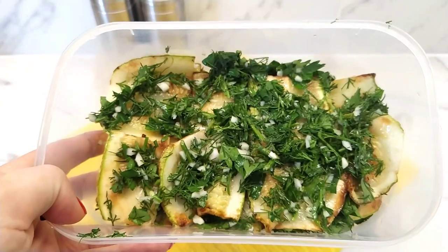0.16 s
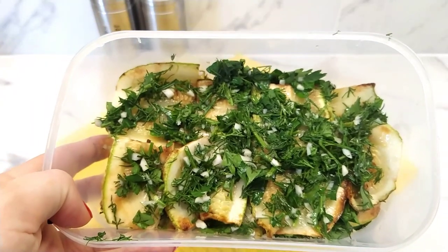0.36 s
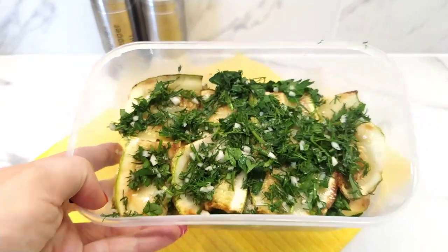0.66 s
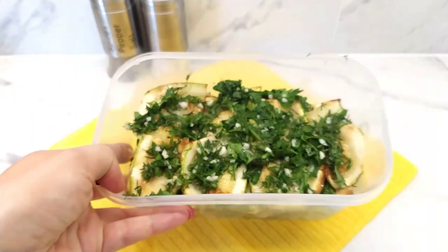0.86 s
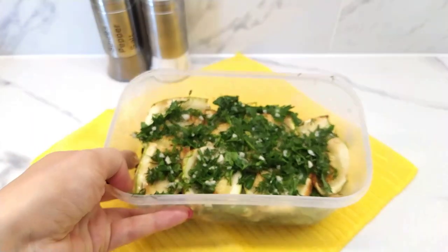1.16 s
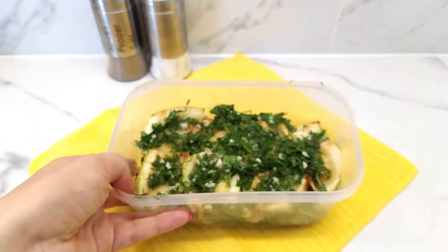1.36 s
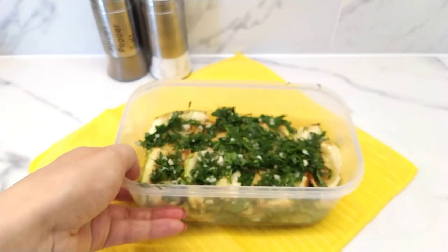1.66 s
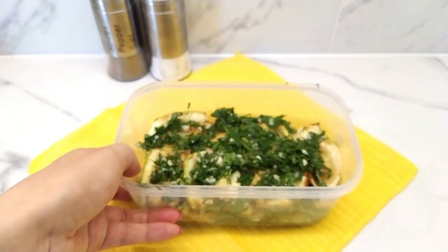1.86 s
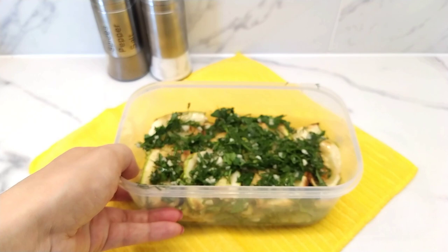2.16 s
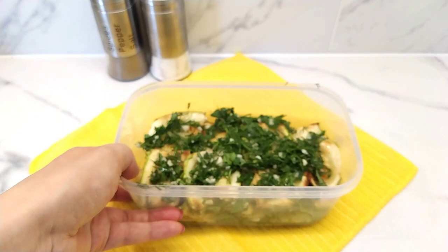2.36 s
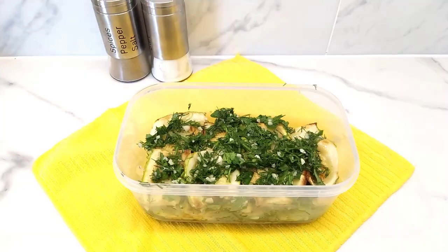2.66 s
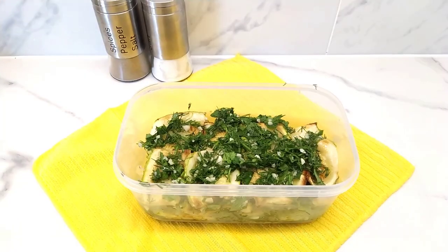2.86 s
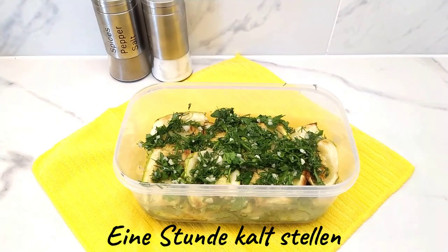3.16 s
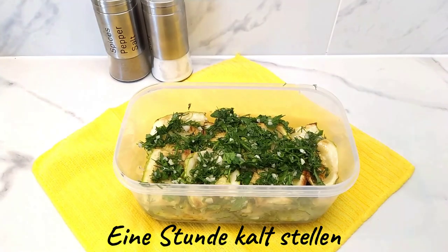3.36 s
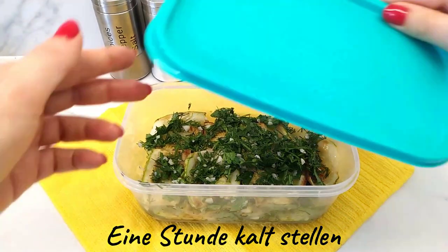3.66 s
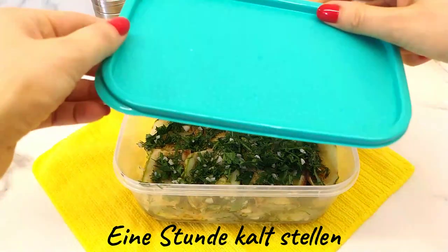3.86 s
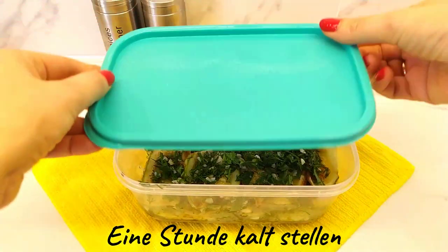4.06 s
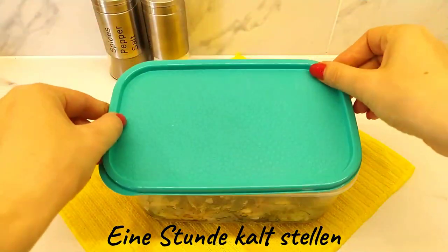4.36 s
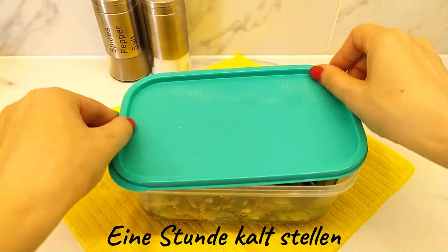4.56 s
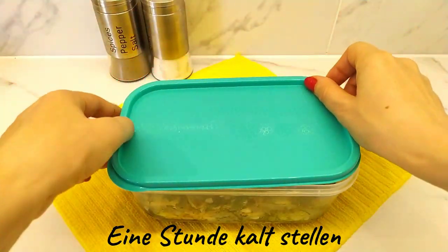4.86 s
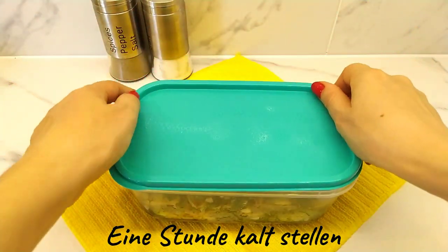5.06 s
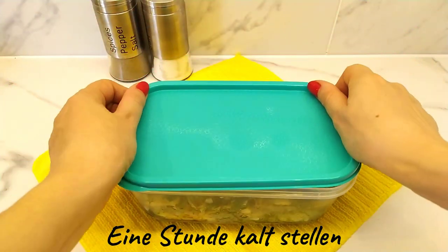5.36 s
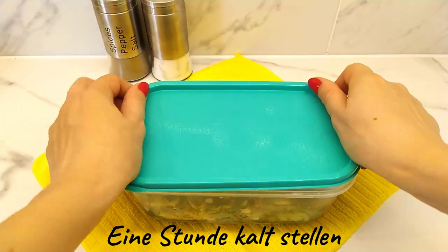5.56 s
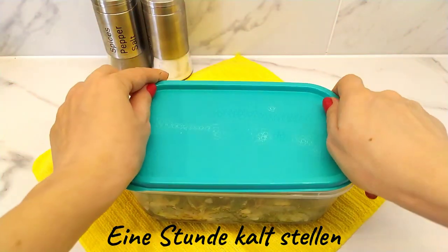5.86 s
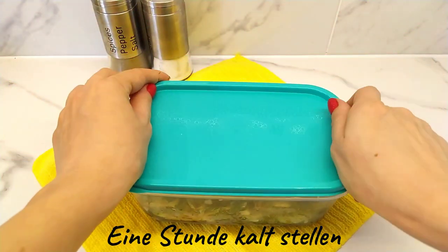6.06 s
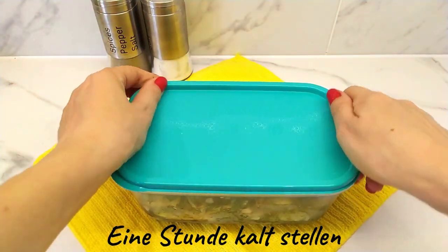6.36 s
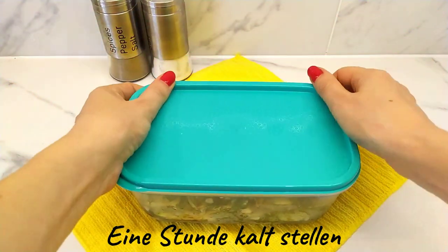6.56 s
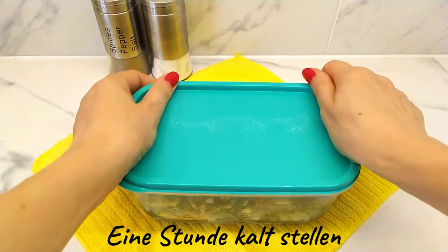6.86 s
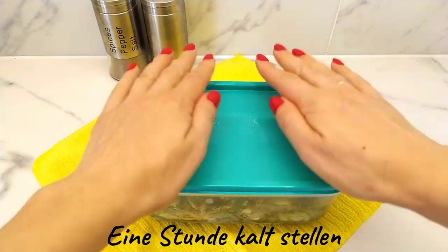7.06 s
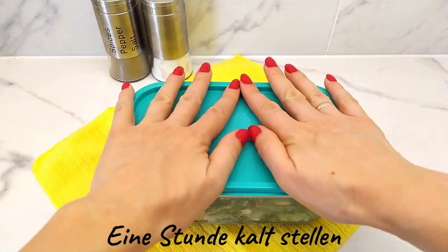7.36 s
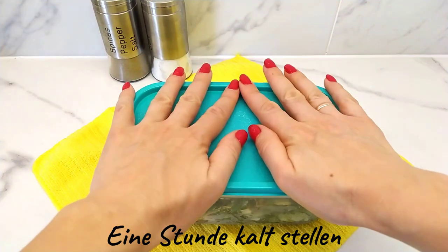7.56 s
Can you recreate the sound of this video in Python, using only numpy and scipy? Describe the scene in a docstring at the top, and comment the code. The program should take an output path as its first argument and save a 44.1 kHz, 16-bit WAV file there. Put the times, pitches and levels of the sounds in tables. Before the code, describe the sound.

A soft lid is fumbled onto a plastic food box with hollow knocks and scrapes, then snaps shut over low kitchen hum.

```python
"""A soft lid is slid into place and snapped on a plastic food box: each contact flexes the lid, rings the
stiff walls and cracks at the rim, as damped modes and bursts of noise. Close by, rim and base stick and
slip, skin hisses over the plastic, and dull thuds pass through the cloth into the kitchen worktop; one
faint dry click stands apart. Around it: the small tiled room's echoes, mains hum, a hollow drone, rumble,
even air noise, and a soft distant rush with whistles, in stereo through a phone's microphone."""
import sys
import numpy as np
from scipy import signal
from scipy.fft import rfft, irfft, next_fast_len
from scipy.io import wavfile
from scipy.ndimage import uniform_filter1d

SR = 44100
rng = np.random.default_rng(int(sys.argv[2]) if len(sys.argv) > 2 else 0)


def master_out(mix):
    """Clip the mix to full scale and print it as 16-bit PCM to the path in sys.argv[1]."""
    frames = np.transpose(np.atleast_2d(mix))
    ceiling = np.clip(frames, -1, 1)
    pcm = np.round(ceiling * 32767).astype(np.int16)
    wavfile.write(sys.argv[1], SR, pcm)


N = 340011
TIME = np.arange(N) / SR
RING_TIME = TIME[:SR // 3]  # time axis of every hit and of the room's response

# Levels are layer levels ahead of the trims in the functions, the room and the microphone.
# mains hum, wavering: (t/s, level/dB)
HUM_LEVEL = [(0, -47.5), (2.7, -47), (3.45, -47.5), (5.9, -47.5), (6.15, -50.5), (6.35, -47), (6.75, -48),
             (7, -44), (7.2, -47.5), (7.7, -46)]
# soft distant rush that swells and dies away: (t/s, level/dB)
RUSH_LEVEL = [(0, -67.5), (1.2, -63), (1.8, -62.5), (2.3, -67.5), (3.4, -69), (7.7, -70)]
# faint wavering tones in the rush: (start t/s, end t/s, from f/Hz, to f/Hz, width/Hz, level/dB re rush)
WHISTLES = [(0, .8, 296, 300, 35, -3), (.25, .75, 440, 435, 50, -7), (.92, 1.78, 311, 332, 36, -1.5),
            (1, 2.1, 165, 165, 22, -9), (0, 1.9, 1590, 1950, 55, -15), (.95, 1.8, 1960, 2050, 55, -17),
            (.3, 1.3, 3430, 3510, 100, -21.5), (2.03, 2.2, 1560, 1560, 60, -15)]
# early echoes from worktop, tiles and cupboards: (delay t/s, level/dB)
ECHOES = [(.0023, -26), (.0062, -37), (0.011, -16), (0.025, -26)]
# soft bumps of the box on the worktop: (t/s, level/dB, f/Hz)
BUMPS = [(2.225, -49.5, 100), (2.267, -50.5, 144), (2.644, -51.5, 119), (2.669, -47.5, 119),
         (2.705, -53, 125), (2.761, -51, 125), (2.866, -45.5, 78), (2.872, -56, 190), (4.246, -47, 118),
         (4.611, -47, 117), (6.948, -53, 125)]
# base scuffing over the cloth: (start t/s, length/s, rasp level/dB, groan level/dB, groan f/Hz)
SCUFFS = [(1.867, 0.037, -63, -65.5, 422), (2.19, 0.046, -67.5, -62.5, 540),
          (2.215, 0.022, -64.5, -58, 760), (2.308, 0.052, -70, -77, 728), (2.665, 0.066, -91, -69.5, 360),
          (2.86, .04, -88, -61.5, 424), (3.154, 0.02, -68, -69, 1210), (7.286, 0.079, -71, -69.5, 369)]
# resonances of the scuffing base: (f/Hz, width/Hz, level/dB)
BASE_MODES = [(1300, 600, -3), (2200, 550, 0), (3700, 700, -2)]
# skin brushing the box: (start t/s, length/s, hiss level/dB, focus f/Hz)
BRUSHES = [(0.13, 0.14, -68, 13000), (0.3, 0.11, -71.5, 10500), (0.404, 0.035, -67.5, 8500),
           (0.468, 0.073, -66.5, 10200), (0.616, 0.059, -70, 9000), (0.741, 0.026, -64, 8300),
           (0.81, 0.022, -70.5, 8800), (0.955, 0.031, -60, 8800), (1.013, 0.026, -59.5, 8300),
           (1.126, 0.022, -68.5, 7500), (1.344, .02, -69, 9100), (1.48, 0.021, -71.5, 9500),
           (1.98, .04, -71.5, 11000), (2.14, 0.061, -76, 10000), (2.207, 0.057, -64, 7900),
           (2.288, 0.054, -57.5, 11700), (2.362, .035, -65, 11500), (3.163, 0.035, -64, 8900),
           (3.446, 0.032, -65.5, 10000), (3.525, 0.034, -65, 8900), (4.85, 0.023, -63, 10000),
           (5.003, 0.027, -72.5, 9400), (5.134, 0.045, -71.5, 9500), (7.341, 0.034, -68, 10000),
           (7.511, 0.073, -70.5, 7700)]
# rim dragging under the lid: (start t/s, length/s, judder level/dB, scratch level/dB, squeak level/dB,
# nominal slips per s)
DRAGS = [(3.883, .022, -48.5, -57, -80, 245), (3.928, 0.02, -48, -59, -80, 218),
         (4.137, 0.05, -60, -70, -74, 102), (4.201, 0.037, -49.5, -57.5, -67, 224),
         (4.245, 0.035, -54, -71, -80, 130), (4.492, 0.093, -55, -71, -80, 91),
         (4.587, 0.046, -48.5, -67, -73, 85), (4.664, 0.013, -48.5, -70, -74, 80),
         (4.74, .03, -57, -80, -90, 110), (4.805, 0.039, -47, -60, -62.5, 84),
         (5.244, .008, -47, -65, -85, 290)]
# contacts of fingers, lid and rim, and one faint dry click (3.105 s) built from the same layers:
# (t/s, wall ring level/dB, rim crack level/dB, fine tick level/dB, lid flex level/dB,
# left minus right/dB, ring of the touched spot f/Hz)
CONTACTS_AND_CLICK = [(1.855, -64, -59.5, -79, -66, 0, 744), (2.867, -67, -77, -83, -58, 2, 800),
                      (3.1052, -67, -68.5, -73, -62, -1, 700), (3.2924, -67, -54, -66, -67, -0.5, 1010),
                      (3.454, -68, -61, -69, -67, -4, 910), (3.5917, -42, -61, -70, -46.5, 0, 900),
                      (3.5965, -45, -62, -78, -64, 2, 990), (3.6095, -75, -54.5, -61, -54, 0, 620),
                      (3.792, -56, -61.5, -68, -54.5, -1, 780), (3.853, -74, -63, -71, -66, 0, 900),
                      (3.883, -47, -57, -58, -73, -6.5, 900), (3.8875, -44.5, -51, -58, -54, -1, 615),
                      (3.9395, -45, -59.5, -70, -51, 2, 780), (4.047, -50.5, -54, -59, -49.5, 0, 613),
                      (4.209, -50.5, -68, -70, -64, -4, 480), (4.2148, -50, -60, -62, -64, 4, 604),
                      (4.363, -59, -69.5, -76, -56.5, 0, 620), (4.4589, -58, -66, -70, -68, 1, 1050),
                      (4.486, -57.5, -64.5, -75, -52, 0, 1040), (4.601, -67, -65, -66, -71, 1, 980),
                      (4.755, -68, -55.5, -65, -62, -2, 1000), (4.761, -73, -57, -64, -66, 0, 1000),
                      (4.801, -47.5, -70, -70, -55, -1, 600), (4.8119, -55, -68, -64, -59, 2, 970),
                      (4.825, -72, -59, -63, -43.5, 0, 974), (4.837, -55, -60, -68, -48, 4, 615),
                      (4.845, -53, -55, -65, -52, 0, 950), (5.258, -81, -52.5, -60, -53, 0, 1110),
                      (5.2616, -47.5, -52, -54, -29, -1.5, 500), (5.355, -42, -51.5, -58, -35.5, 0, 790),
                      (5.384, -42, -55, -48, -31, 0, 710), (5.3906, -57, -58, -49, -31, -1, 1110),
                      (5.3979, -50, -57, -51, -44, -10, 840), (5.4078, -54, -56, -55, -38.5, 0, 800),
                      (5.417, -58, -62, -56, -47, 0, 800), (5.809, -62, -90, -90, -58, -1, 780),
                      (6.108, -55, -61, -64, -73, -6, 1010)]
# the rim springs from a finger or snaps over its bead: (the seven columns of the contacts,
# contact time constant/s, rim ring level/dB)
SNAPS = [(2.4, -68, -44.5, -49.5, -53, 3, 1290, 0.0003, -58),
         (5.3858, -36.5, -31, -39, -28, 0.5, 890, 0.00055, -40),
         (6.114, -57, -50, -51.5, -48, 0.5, 1000, 0.00043, -58.5),
         (7.0176, -50, -49.5, -51, -58, -1.5, 1260, 0.00055, -42)]
# the lid pops in, seats and bounces, now taut and higher: (t/s, level/dB, f/Hz, t60/s)
SEATING = [(5.386, -38.5, 231, 0.038), (5.3863, -33.5, 446, 0.0075), (5.3868, -37, 982, 0.014),
           (5.391, -29.5, 306, 0.079), (5.404, -33, 388.4, .1), (5.436, -42, 389.4, 0.24)]

# modes of the lid flexing over the enclosed air: (f/Hz, level/dB, t60/s)
LID_MODES = [(180, -12, 0.072), (214, -1, 0.039), (310, -1, 0.1)]
# modes of the box's stiff walls: (f/Hz, level/dB, t60/s)
WALL_MODES = [(378, 4.5, 0.12), (460, -6.5, 0.26), (589.4, 9.5, 0.095), (673, -3, 0.055), (783, -1, 0.031),
              (967, 7, 0.042), (1060, 3.5, 0.03), (1360, -6, 0.036), (2066, -5, 0.064)]
# the shut box ringing on faintly: (f/Hz, level/dB, t60/s)
SHUT_MODES = [(590, 2, 0.18), (732, 0, 0.18), (820, 3, 0.12), (1150, -3, .2), (1360, -4, .22)]

# colour of the low rumble: (f/Hz, level/dB per Hz)
RUMBLE_COLOUR = [(20, -47), (30, -8), (39, 5), (60, 6.5), (85, 6), (125, 0.5), (170, -3.5), (230, -49.5)]
# colour of the even air noise: (f/Hz, level/dB per Hz)
AIR_COLOUR = [(170, -13.5), (240, -15.5), (330, -12), (480, -18.5), (700, -20), (930, -19.5), (1700, -31.5),
              (3900, -33), (8000, -37), (12000, -40.5), (15500, -55)]
# colour of the distant rush: (f/Hz, level/dB per Hz)
RUSH_COLOUR = [(200, -9), (300, -4), (460, 7.5), (600, -5.5), (900, -0.5), (1400, -5), (2100, -7.5),
               (3500, -14), (6000, -24), (15000, -55)]
# colour of the base rasping over cloth: (f/Hz, level/dB per Hz)
RASP_COLOUR = [(400, 0), (700, -3), (1400, -2), (2200, 4.5), (2900, -2), (3800, -2), (6500, -2),
               (10000, -13), (15000, -24)]
# colour of skin on plastic: (f/Hz, level/dB per Hz)
SKIN_COLOUR = [(600, -45), (1500, 14), (4000, -1.5), (6000, -2), (8500, 1.5), (11000, -2), (15000, -7.5)]
# colour of the dragging rim's scratch: (f/Hz, level/dB per Hz)
SCRATCH_COLOUR = [(500, -24), (1500, 8), (3500, 8.5), (6000, 3), (8600, -3), (11000, -2), (15000, -18)]
# colour of its tiny squeak: (f/Hz, level/dB per Hz)
SQUEAK_COLOUR = [(6500, -36), (8000, -11), (8600, 4), (9300, -22), (12000, -38)]
# colour of the crack at the rim: (f/Hz, level/dB per Hz)
CRACK_COLOUR = [(600, -23), (1200, 2), (1750, -2), (2450, 0.5), (3300, -1), (4300, -0.5), (6000, -2),
                (9000, -11), (16000, -45)]
# colour of the fine tick: (f/Hz, level/dB per Hz)
TICK_COLOUR = [(2500, -24), (5000, -28), (7000, -6), (9500, -4.5), (12000, -11), (15500, -20)]
# quick shiver of the taut rim: (f/Hz, level/dB per Hz)
RIM_COLOUR = [(300, -17), (660, 5.5), (900, 4), (1260, 9.5), (1600, -2.5), (1900, 3), (2400, 2.5),
              (2750, 3), (3150, -15), (3650, -10), (4250, -3), (5000, -3), (9000, -33)]

RUMBLE_START_DB, RUMBLE_FALL_DB_PER_S = -55.5, 0.62
WHISTLE_FADE_S, WHISTLE_WAVER = 0.079, 0.005  # waver is a share of the frequency
SCUFF_ATTACK_S, SCUFF_RELEASE_S = 0.016, 0.051
BRUSH_ATTACK_S, BRUSH_RELEASE_S = 0.01, 0.0083
DRAG_ATTACK_S, DRAG_RELEASE_S = 0.0078, 0.017
SLIP_JITTER, SLIP_UNEVEN_DB = 0.16, 2  # scatter of the log gap between slips, and of their size
SCRATCH_GRAIN_S = 0.0025
PRESSURE_DB, PRESSURE_HZ = 3, 31.2  # how much and how fast the hand's pressure varies while dragging
LIGHT_HIT_S, EDGE_DB = 0.00048, -7  # time constant of a light hit; hard edge of cracks and ticks
SHUT_S, SHUT_DB = 5.387, -47.5
MIC_TOP_HZ = 15600


def undb(db):
    """Decibels to gain."""
    return 10 ** (np.asarray(db) / 20)


def unit(x):
    """Scale to rms 1."""
    return x / np.sqrt(np.mean(x ** 2))


def blow(x, span=0.02):
    """Scale a stereo hit so that its energy equals rms 1 over the span in seconds."""
    return x / np.sqrt(np.sum(x ** 2) / (2 * span * SR))


def add(out, start, x):
    """Mix a stereo sound in at its start time in seconds."""
    i = int(start * SR)
    out[:, i:i + x.shape[1]] += x[:, :N - i]


def convolve(x, response):
    """Pass a sound through a response, keeping its length."""
    return signal.fftconvolve(np.atleast_2d(x), np.atleast_2d(response), axes=1)[:, :x.shape[-1]]


def filtered(x, order, hz, kind="low"):
    """Butterworth low-pass or high-pass."""
    return signal.sosfilt(signal.butter(order, hz, kind, fs=SR, output="sos"), x)


def colour(x, points, size=4096):
    """Minimum-phase filter with the given (f/Hz, level/dB) outline."""
    hz, db = np.transpose(points)
    bins = np.maximum(np.fft.rfftfreq(size, 1 / SR), 1)
    outline_db = np.interp(np.log(bins), np.log(hz), db)
    # 12 dB per octave down below the first point
    outline_db = outline_db - 12 * np.maximum(np.log2(hz[0] / bins), 0)
    # folding the cepstrum makes the filter causal
    cepstrum = irfft(np.log(undb(outline_db)))
    cepstrum[1:size // 2] *= 2
    cepstrum[size // 2 + 1:] = 0
    return convolve(x, irfft(np.exp(rfft(cepstrum))))


def pair(n, likeness):
    """Left and right noise with a shared part."""
    noise, share = rng.standard_normal((3, n)), np.clip(likeness, 0, 1)
    return np.sqrt(share) * noise[0] + np.sqrt(1 - share) * noise[1:]


def pan(db):
    """Left and right gains for a left-minus-right level."""
    return undb(np.array([[db], [-db]]) / 2)


def walk(rate):
    """Smooth random wander of rms 1, stepping at the given rate per second."""
    k = max(int(SR / rate), 1)
    steps = np.repeat(rng.standard_normal(N // k + 1), k)
    return unit(uniform_filter1d(uniform_filter1d(steps, k), k)[:N])


def narrow(hz, width):
    """Noise in one narrow resonance whose centre may move."""
    phase = 2 * np.pi * np.cumsum(hz * np.ones(N)) / SR
    return unit(walk(width) * np.cos(phase) + walk(width) * np.sin(phase))


def stroke(start, length, attack_s, release_s):
    """Gain of one movement: it swells up to its start, holds and dies away."""
    outside = np.maximum((start - TIME) / attack_s, (TIME - start - length) / release_s)
    return np.exp(-np.clip(outside, 0, 20))


def slips(rate, uneven_db):
    """Random stick-slip releases of unequal size."""
    return (rng.random(N) < rate / SR) * undb(uneven_db * np.clip(rng.standard_normal(N), -2, 2))


def grit(releases, grain_s, outline):
    """Every release throws a tiny, decaying puff of coloured noise."""
    shape = convolve(releases, np.exp(-RING_TIME / grain_s))
    return unit(colour(pair(N, 0.033) * shape, outline))


def ring(modes, scatter_db, detune, spread):
    """Damped modes; place and grip shift strength and pitch; each sits spread radians off centre."""
    out = 0
    for (hz, db, t60), (a, b, c) in zip(modes, rng.standard_normal((len(modes), 3))):
        offset = spread * np.sign(c) * np.array([[1], [-1]])
        phase = 2 * np.pi * hz * (1 + detune * b) * RING_TIME + offset
        out = out + undb(db + scatter_db * a - 60 * RING_TIME / t60) * np.sin(phase)
    return out * (1 - np.exp(-RING_TIME / 0.0025))


def mains_hum():
    """A 100 Hz tone, slightly unsteady in phase and level."""
    tone = unit(np.sin(2 * np.pi * 100 * TIME + 0.061 * walk(15.0)))
    return tone * undb(np.interp(TIME, *np.transpose(HUM_LEVEL)) + 0.5 * walk(11))


def hollow_drone():
    """A narrow resonance of noise around 300 Hz."""
    return narrow(300, width=49) * undb(-70)


def low_rumble():
    """Bass noise, largely alike left and right, that slowly eases."""
    return unit(colour(pair(N, 0.65), RUMBLE_COLOUR)) * undb(RUMBLE_START_DB - RUMBLE_FALL_DB_PER_S * TIME)


def room_air():
    """Wide, even air noise with a slight wander in level."""
    return unit(colour(pair(N, 0.12), AIR_COLOUR)) * undb(-67 + 0.86 * walk(13))


def distant_rush():
    """Coloured noise far off, with narrow wavering tones gliding in and out under the same swell."""
    rush = unit(colour(pair(N, 0.07), RUSH_COLOUR))
    for start, end, from_hz, to_hz, width, db in WHISTLES:
        hz = np.interp(TIME, [start, end], [from_hz, to_hz]) * (1 + WHISTLE_WAVER * walk(5))
        fade = stroke(start, end - start, WHISTLE_FADE_S, WHISTLE_FADE_S)
        rush = rush + undb(db) * narrow(hz, width) * fade
    return rush * undb(np.interp(TIME, *np.transpose(RUSH_LEVEL)))


def background():
    """The low layers and the airy ones, each group a little to the left."""
    low = mains_hum() + hollow_drone() + low_rumble()
    airy = room_air() + distant_rush()
    return low * pan(1.4) + airy * pan(0.65)


def kitchen(x, wet_db=-7, t60_low=0.44, t60_high=0.47, split_hz=1200):
    """A few close echoes, then the short bright tail of a tiled room."""
    noise = pair(len(RING_TIME), 0.037)
    low = filtered(pair(len(RING_TIME), 1.0), 2, split_hz)
    high = colour(noise, [(500, 0.79), (1400, 2.5), (6500, 5.6), (10000, 1.5), (15000, 6.9)])
    tail = low * undb(-60 * RING_TIME / t60_low) + high * undb(-60 * RING_TIME / t60_high)
    tail *= 1 - np.exp(-RING_TIME / 0.0014)
    # reflections arrive in clumps
    tail *= undb(3.5 * walk(220)[:len(RING_TIME)])
    response = undb(wet_db) * tail / np.sqrt(np.sum(tail ** 2) / 2)
    # each echo reaches left and right at slightly different times
    for (delay, db), skew in zip(ECHOES, rng.uniform(-0.00014, 0.0001, len(ECHOES))):
        response[[0, 1], [int((delay + skew) * SR), int((delay - skew) * SR)]] += undb(db)
    response[:, 0] += 1  # direct sound
    return convolve(x, response)


def bumps(t60=0.074):
    """The filled box thuds dully through the cloth into the worktop: short damped sines."""
    out = np.zeros((2, N))
    for start, db, hz in BUMPS:
        thud = np.sin(2 * np.pi * hz * RING_TIME) * undb(-60 * RING_TIME / t60)
        thud *= 1 - np.exp(-RING_TIME / 0.004)
        add(out, start, undb(db) * blow(np.array([thud, thud])))
    return out


def scuffing(hollow_hz=260, hollow_db=-4, base_db=-7, groan_width=0.5):
    """The base rasps over the cloth; walls and hollow of the box groan as it sticks and slips."""
    base = 0
    for hz, width, db in BASE_MODES:
        # the resonances come and go
        base = base + undb(db + 5 * walk(25)) * narrow(hz * (1 + 0.03 * walk(14)), width)
    rasp = grit(slips(rate=600, uneven_db=0.5), 0.0023, RASP_COLOUR) * undb(1.0)
    rasp = rasp + undb(base_db) * unit(base)
    hollow = undb(hollow_db) * narrow(hollow_hz, width=330)
    out = 0
    for start, length, rasp_db, groan_db, hz in SCUFFS:
        groan = narrow(hz, width=groan_width * hz) + hollow
        gain = stroke(start, length, SCUFF_ATTACK_S, SCUFF_RELEASE_S)
        out = out + gain * (undb(rasp_db) * rasp + undb(groan_db) * groan)
    return out


def brushing(brush_db=-2, focus_db=7):
    """Skin hisses over the plastic; each stroke favours its own focus by focus_db per octave."""
    hiss = grit(slips(rate=5000, uneven_db=5.5), 0.0037, SKIN_COLOUR)
    size = next_fast_len(N, True)
    spectrum, bins = rfft(hiss, size), np.fft.rfftfreq(size, 1 / SR) + 1
    out = 0
    for start, length, db, hz in BRUSHES:
        tuned = unit(irfft(spectrum * undb(-focus_db * np.abs(np.log2(bins / hz))))[:, :N])
        out = out + undb(db) * stroke(start, length, BRUSH_ATTACK_S, BRUSH_RELEASE_S) * tuned
    return undb(brush_db) * out * pan(8.2)


def catches(rate, count=3000):
    """The rim catches and lets go at a nearly even pace: impulses of uneven size."""
    gap, size = rng.standard_normal((count, 2)).T
    at = (np.cumsum(np.exp(SLIP_JITTER * gap)) * SR / rate).astype(int)
    return unit(np.bincount(at[at < N], undb(SLIP_UNEVEN_DB * size)[at < N], N))


def puffs(pushes, outline):
    """Each push throws a short puff of coloured noise of the same energy."""
    decay = np.exp(-2 * RING_TIME / SCRATCH_GRAIN_S)
    power = np.abs(convolve(pushes ** 2, decay / decay.sum()))
    return unit(colour(pair(N, 0.043), outline)) * np.sqrt(power)


def rubbing(judder_db=-2, scratch_db=-3, squeak_db=-3, soft_hz=1700):
    """The dragging rim sticks and slips; each slip judders the box, scratches and squeaks."""
    pushes = 0
    for start, length, *levels_db, rate in DRAGS:
        drag_slips = stroke(start, length, DRAG_ATTACK_S, DRAG_RELEASE_S) * catches(rate)
        pushes = pushes + undb(levels_db)[:, None] * drag_slips
    judder, scratch, squeak = pushes
    drag = undb(scratch_db) * puffs(scratch, SCRATCH_COLOUR)
    drag = drag + undb(squeak_db) * puffs(squeak, SQUEAK_COLOUR)
    # the load wanders between two corners, each ringing a little differently
    corner = 1.2 * walk(25)
    for share in np.cos(corner), np.sin(corner):
        lid = blow(ring(LID_MODES, scatter_db=2, detune=0.035, spread=0.15))
        walls = blow(ring(WALL_MODES, scatter_db=2, detune=0.035, spread=0.5))
        # the soft rim lets go gently, so the high wall modes stay quiet
        body = filtered(lid + walls, 2, soft_hz)
        drag = drag + undb(judder_db) * convolve(share * judder, blow(body, span=1 / SR))
    return drag * undb(PRESSURE_DB * walk(PRESSURE_HZ))


def burst(length, outline, likeness, after_db, after_s, edge_db):
    """A sharp release with a hard leading edge, followed by a brief shiver."""
    release = np.exp(-RING_TIME / length) + undb(after_db) * np.exp(-RING_TIME / after_s)
    shape = (1 - np.exp(-RING_TIME / length)) ** 2 * release
    spectrum = rfft(pair(len(RING_TIME), likeness) * shape)
    # a sudden release pushes all broad bands equally; the outline gives the colour
    spectrum = spectrum / np.sqrt(uniform_filter1d(np.abs(spectrum) ** 2, size=300))
    push = irfft(spectrum, len(RING_TIME)) * (RING_TIME < RING_TIME[-1] / 2)
    push[:, int(length * SR)] += undb(edge_db)
    return blow(colour(push, outline))


def layered_hit(wall, crack, tick, flex, side, spot_hz, length, crack_db=-3, flex_db=-4, wall_db=-3,
                tick_db=-3, knock_db=-6, knock_s=0.00171, focus_db=13.5):
    """Layers of a contact: lid flex, wall ring, knock at the touched spot, rim crack and fine tick."""
    # wall modes answer less with every octave away from the spot's own ring
    wall_modes = [(hz, db - focus_db * abs(np.log2(hz / spot_hz)), t60) for hz, db, t60 in WALL_MODES]
    spot = [(spot_hz / 2, -13), (spot_hz, 0), (1.3 * spot_hz, -4), (2 * spot_hz, -19), (10 * spot_hz, -60)]
    lid_flex = blow(ring(LID_MODES, scatter_db=0.8, detune=0.008, spread=0.15))
    wall_ring = blow(ring(wall_modes, scatter_db=3, detune=0.025, spread=0.42))
    knock = burst(knock_s, spot, likeness=0.8, after_db=-49, after_s=0.0028, edge_db=-16.5)
    rim_crack = burst(length, CRACK_COLOUR, likeness=0.054, after_db=-21.5, after_s=0.0083, edge_db=EDGE_DB)
    fine_tick = burst(length, TICK_COLOUR, likeness=0.023, after_db=19, after_s=0.01, edge_db=EDGE_DB)
    hit = undb(flex + flex_db) * lid_flex
    hit += undb(wall + wall_db) * wall_ring
    hit += undb(wall + knock_db) * knock
    hit += undb(crack + crack_db) * rim_crack
    hit += undb(tick + tick_db) * fine_tick * pan(6)
    return hit * pan(side)


def contacts_and_click():
    """Light contacts and the dry click, snaps that ring the rim, and the lid seating as damped modes."""
    out = np.zeros((2, N))
    for start, *layers in CONTACTS_AND_CLICK:
        add(out, start, layered_hit(*layers, LIGHT_HIT_S))
    for start, *layers, rim_db in SNAPS:
        rim = burst(0.00296, RIM_COLOUR, likeness=0.44, after_db=-28.5, after_s=0.021, edge_db=-2)
        add(out, start, layered_hit(*layers) + undb(rim_db) * rim)
    for start, db, hz, t60 in SEATING:
        mode = ring([(hz, 0, t60)], scatter_db=0, detune=0.0025, spread=0.26)
        add(out, start, undb(db) * blow(mode))
    shut_box = ring(SHUT_MODES, scatter_db=2.0, detune=0.002, spread=0.55)
    add(out, SHUT_S, undb(SHUT_DB) * blow(shut_box))
    # so small a box radiates little bass
    return filtered(out, 2, 115, "high")


def scene():
    """The handled box in the humming kitchen; bumps and background bypass the room's echoes."""
    close_sounds = contacts_and_click() + rubbing() + brushing() + scuffing()
    return kitchen(close_sounds) + bumps() + background()


def record(dry):
    """The phone's microphone cuts the deepest bass and the top."""
    dry = filtered(dry, 4, 28, "high")
    return signal.sosfilt(signal.ellip(10, 0.2, 80, MIC_TOP_HZ, fs=SR, output="sos"), dry)


dry = scene()
out = record(dry)
master_out(out)
```